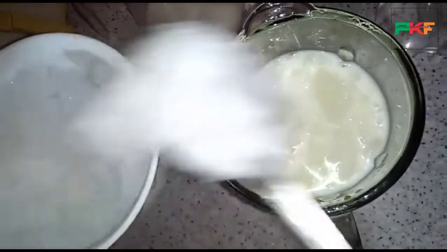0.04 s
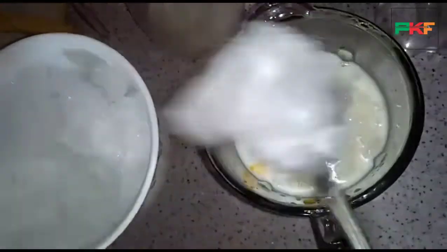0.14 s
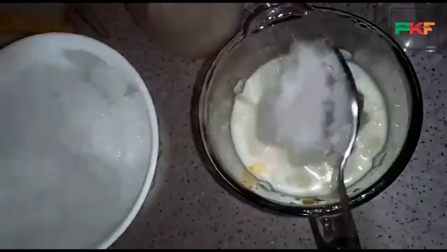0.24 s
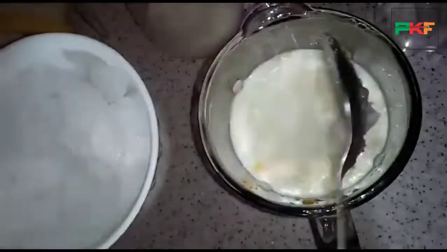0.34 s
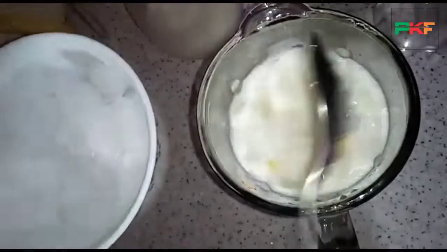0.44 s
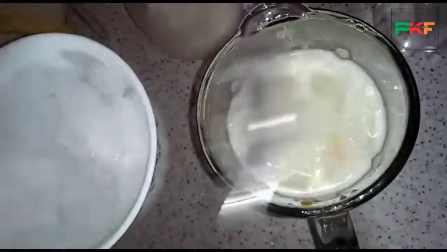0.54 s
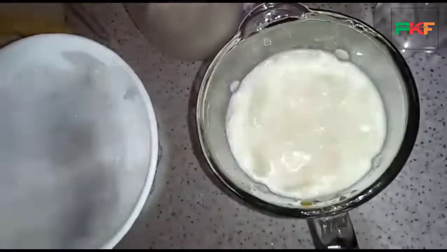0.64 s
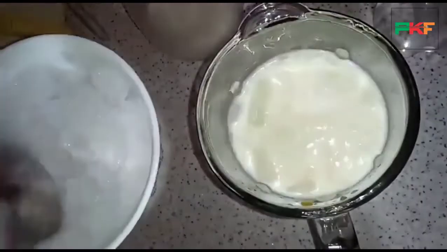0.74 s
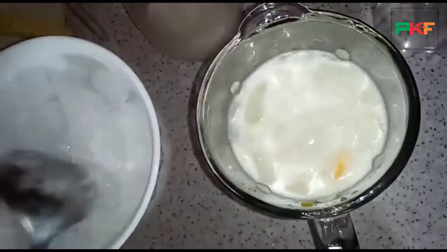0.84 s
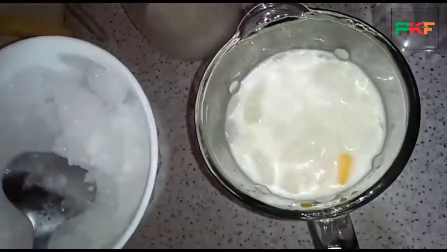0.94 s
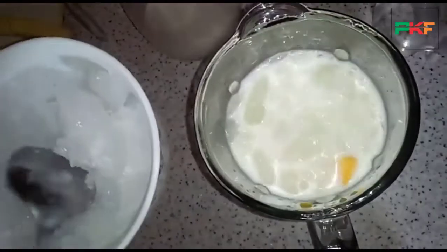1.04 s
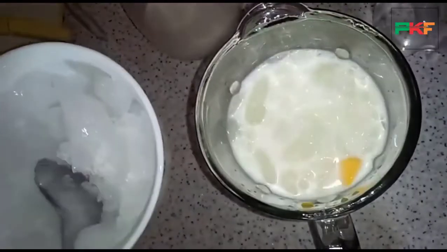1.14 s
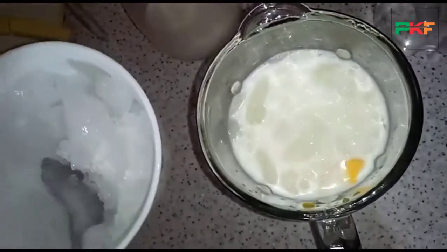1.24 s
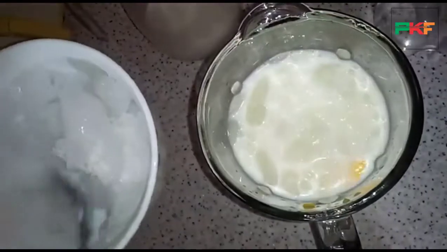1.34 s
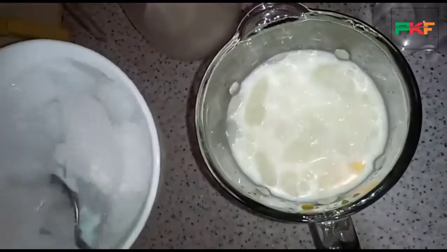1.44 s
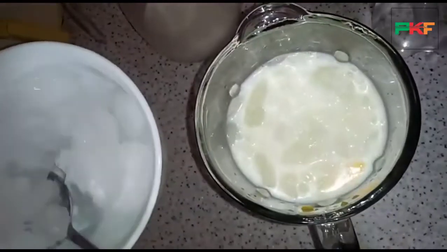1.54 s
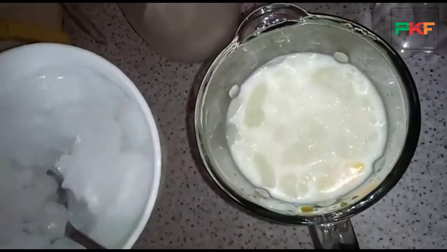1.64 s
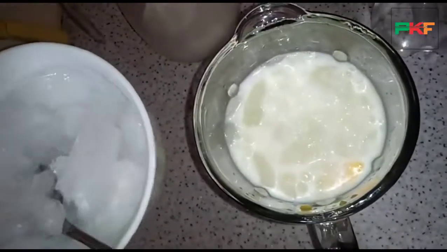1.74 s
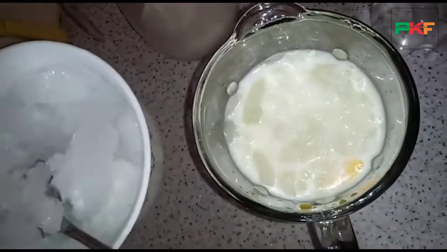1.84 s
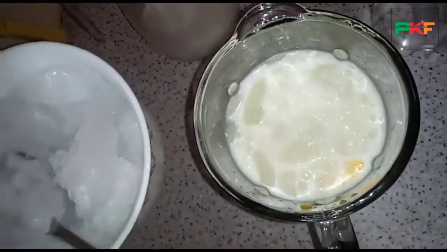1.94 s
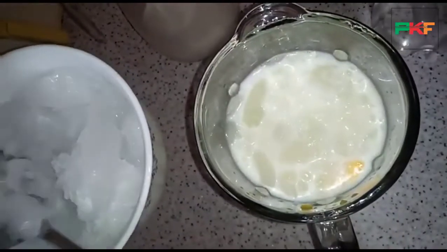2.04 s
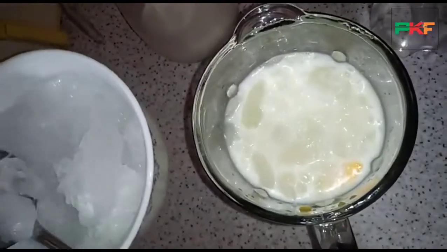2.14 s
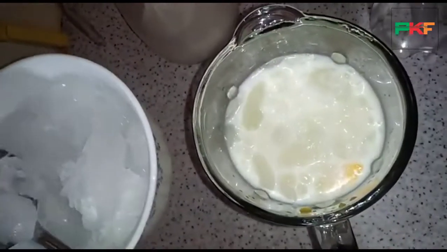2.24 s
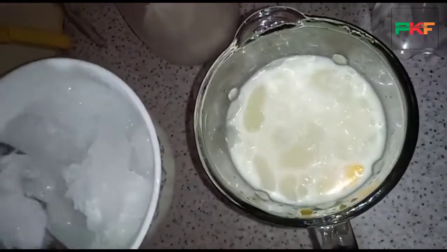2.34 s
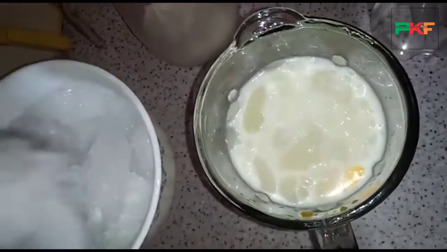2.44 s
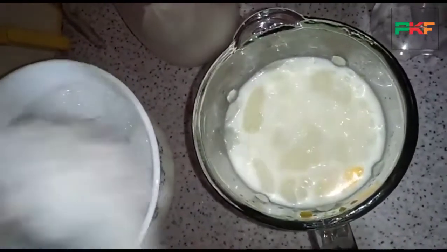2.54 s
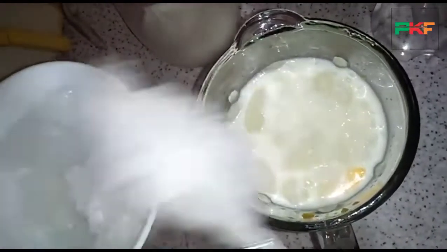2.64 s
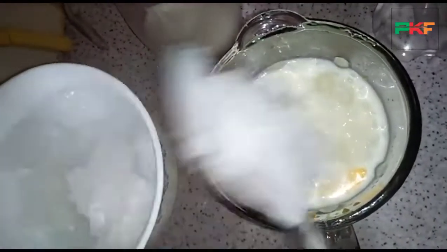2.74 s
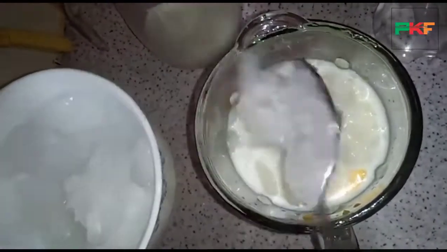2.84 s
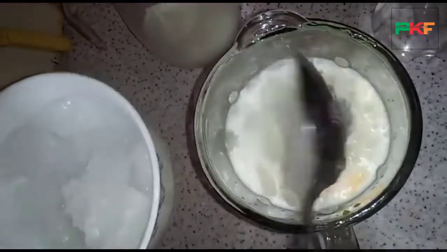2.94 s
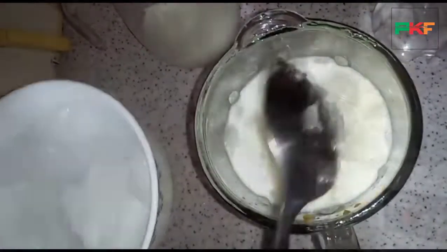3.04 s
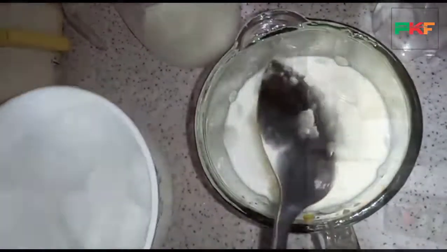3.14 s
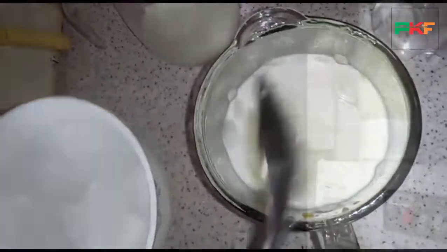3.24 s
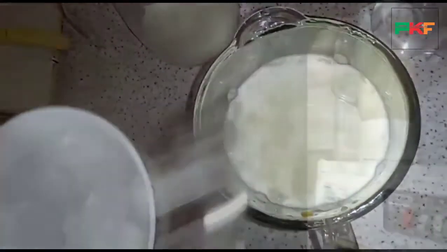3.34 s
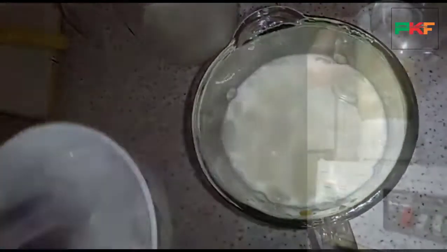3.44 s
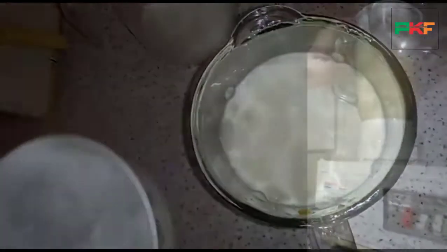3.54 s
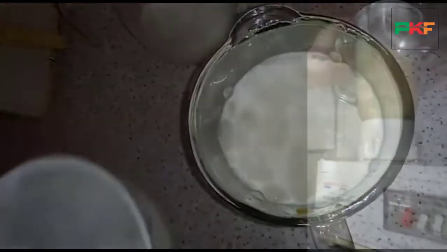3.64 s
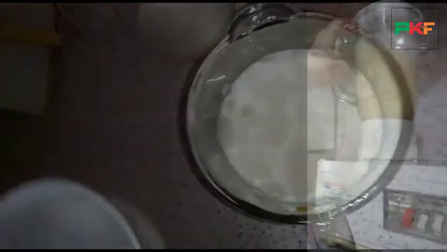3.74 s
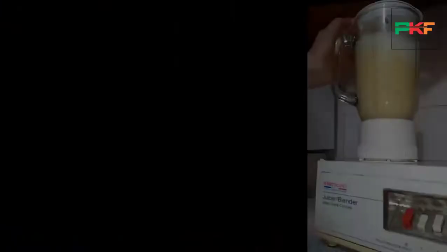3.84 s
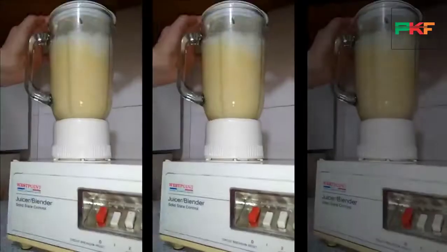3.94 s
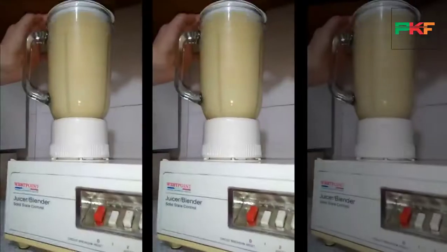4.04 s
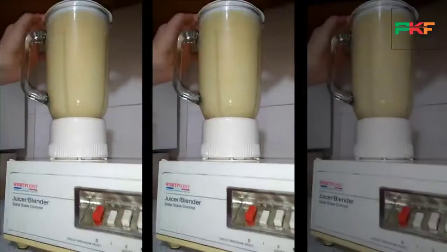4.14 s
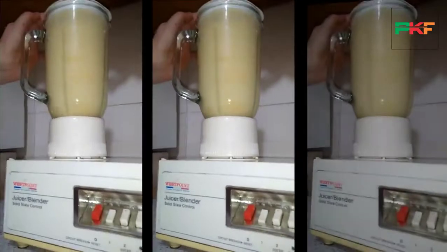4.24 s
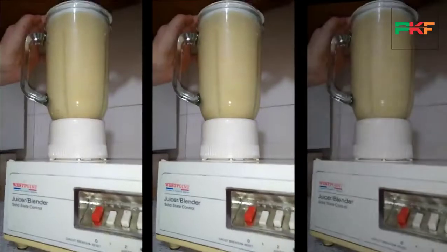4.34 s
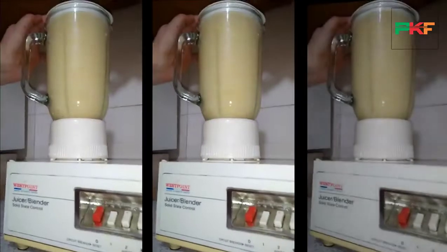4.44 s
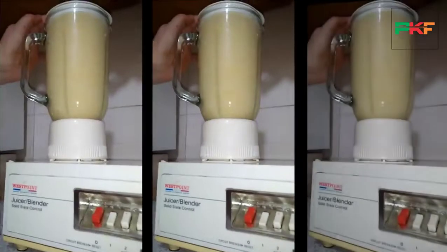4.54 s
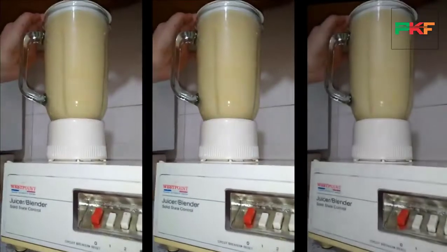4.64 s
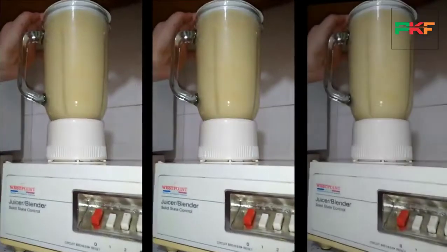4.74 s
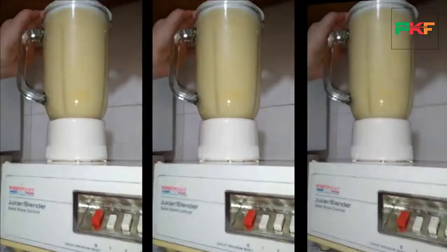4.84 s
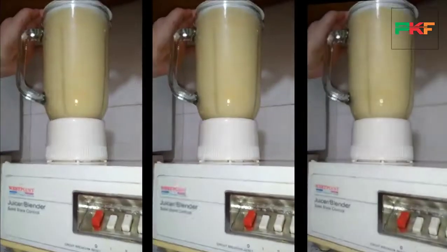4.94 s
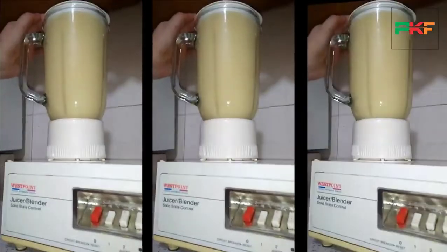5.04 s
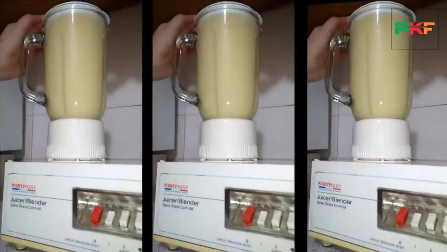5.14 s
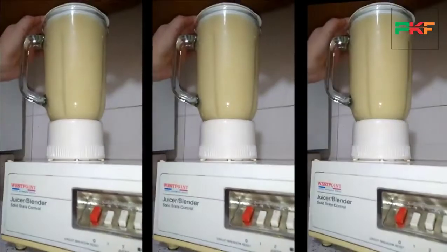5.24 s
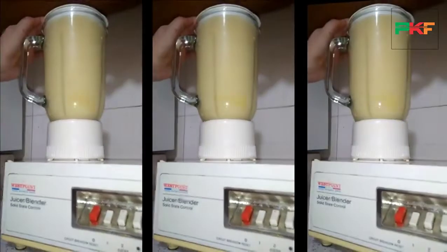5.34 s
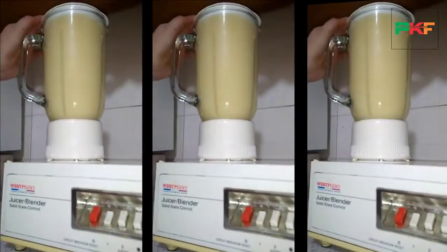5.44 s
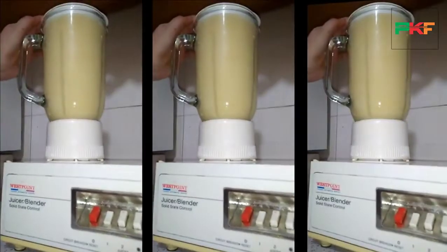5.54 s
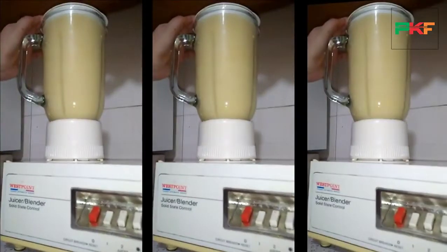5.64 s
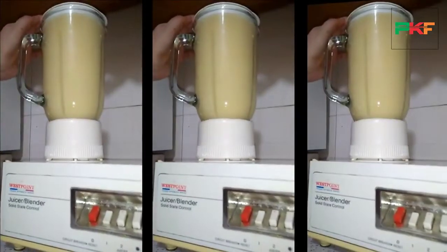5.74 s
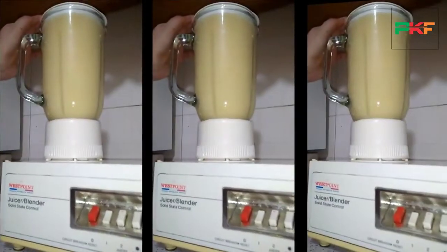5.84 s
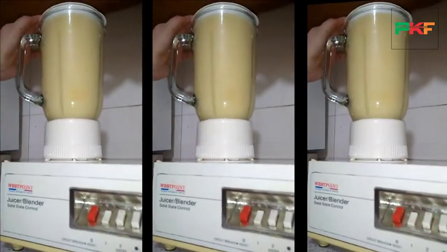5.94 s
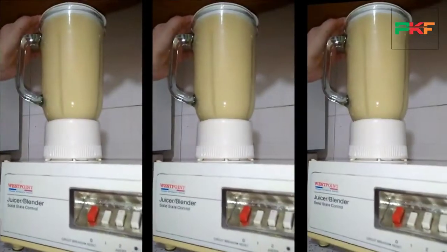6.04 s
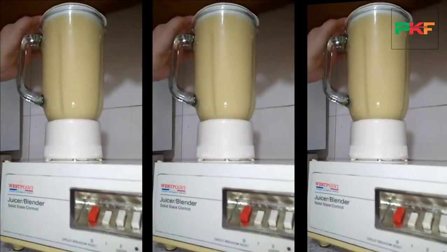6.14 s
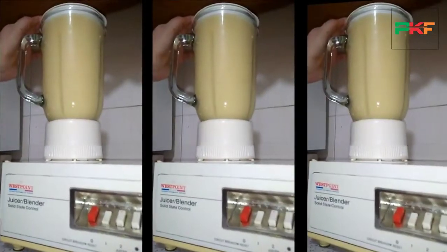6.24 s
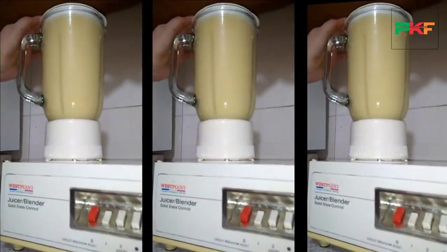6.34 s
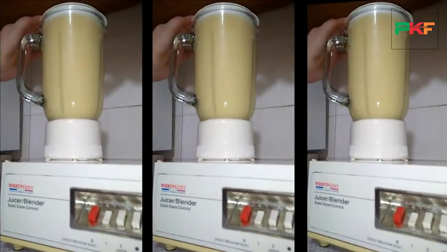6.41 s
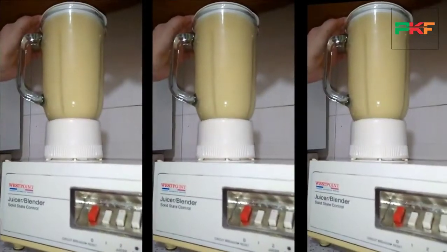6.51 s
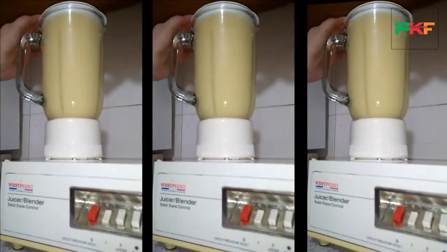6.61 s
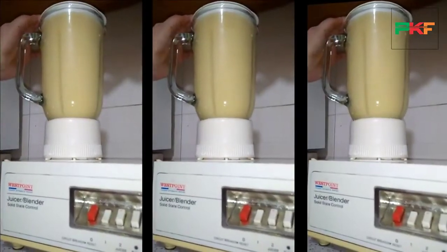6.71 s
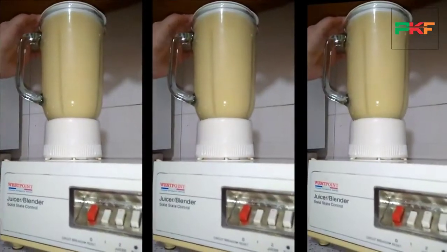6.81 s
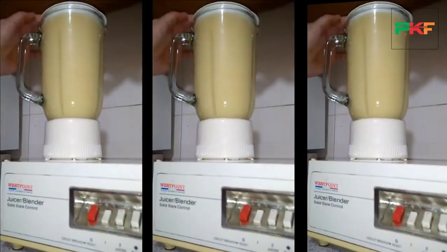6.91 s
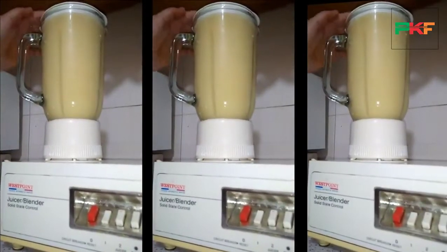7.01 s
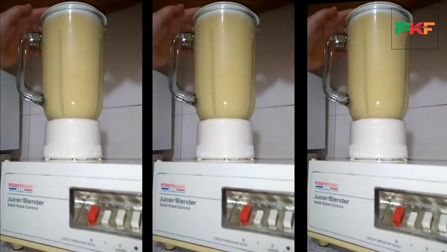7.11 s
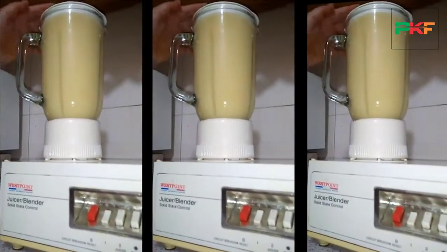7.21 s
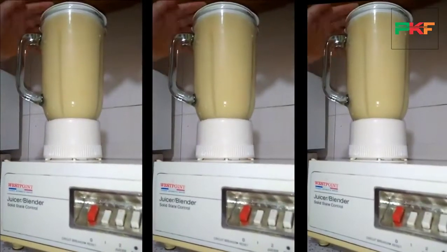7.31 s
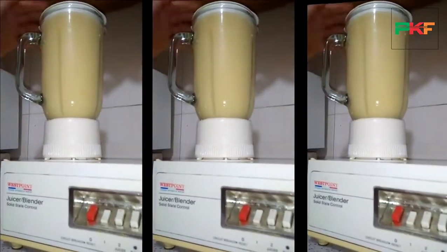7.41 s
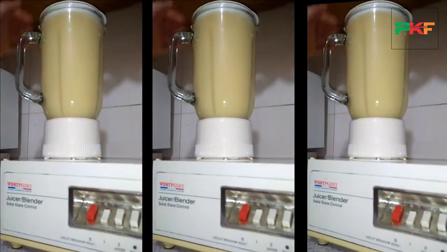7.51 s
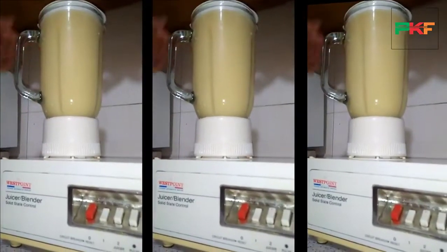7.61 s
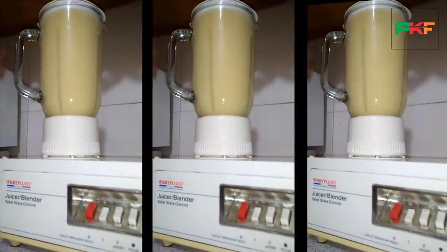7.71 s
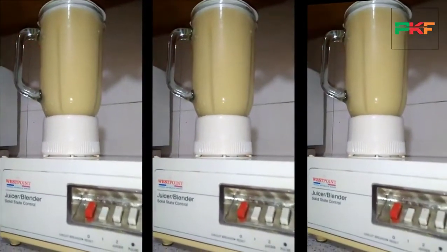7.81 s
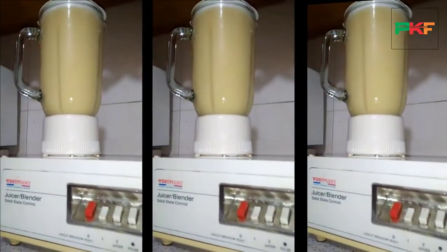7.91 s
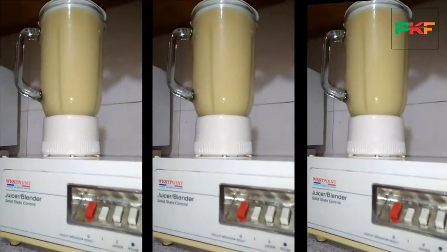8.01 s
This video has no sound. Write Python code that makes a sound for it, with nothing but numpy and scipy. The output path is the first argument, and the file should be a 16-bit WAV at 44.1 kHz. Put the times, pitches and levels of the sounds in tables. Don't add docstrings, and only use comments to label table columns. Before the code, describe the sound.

A spoon crunches and knocks through crushed ice in a plastic tub, ice drops into a glass jar, silence, then a harsh blender roars abruptly.

```python
import sys
import numpy as np
from scipy import signal
from scipy.fft import rfft, irfft, next_fast_len
from scipy.io import wavfile

SR = 44100
rng = np.random.default_rng(int(sys.argv[2]) if len(sys.argv) > 2 else 0)


def store_pcm(level_fs):
    pcm = np.round(np.clip(level_fs, -1, 1) * 32767).astype(np.int16)
    wavfile.write(sys.argv[1], SR, np.atleast_2d(pcm).T)


def field_ratio(decibels):
    return 10 ** (np.asarray(decibels, dtype=float) / 20)


N = 355887
FADE_S, BLENDER_START_S = 3.94, 4.668

# (time [s], hold [s], housing level [dB], spray level [dB])
SURGES = [(4.688, 0.15, -20, -26), (4.815, 0.093, -17.5, -22.5), (4.951, 0.012, -13.5, -17.5),
          (5.0, 0.052, -9, -18.5), (5.089, 0.086, -13, -19), (5.237, 0.071, -9.5, -17),
          (5.354, 0.044, -8, -15), (5.522, 0.1, -17.5, -23.5), (5.623, 0.017, -13.5, -29),
          (5.7, 0.012, -22.5, -26), (5.775, 0.04, -18.5, -27.5), (5.878, 0.0094, -11, -17),
          (5.963, 0.017, -16.5, -21.5), (6.05, 0.036, -13.5, -21), (6.158, 0.001, -13.5, -19),
          (6.245, 0.048, -17, -20), (6.333, 0.003, -14.5, -17), (6.392, 0.11, -17.5, -18.5),
          (6.625, 0.1, -20.5, -18.5), (6.759, 0.033, -14, -15.5), (6.917, 0.031, -14, -16.5),
          (7.103, 0.011, -18.5, -19.5), (7.218, 0.0011, -21.5, -16), (7.295, 0.0009, -19, -19.5),
          (7.427, 0.048, -22.5, -20), (7.539, 0.004, -20, -18.5), (7.682, 0.028, -25, -23),
          (7.736, 0.076, -23, -22.5), (7.911, 0.04, -26, -23)]
SURGE_RISE_DB_PER_S, SURGE_FALL_DB_PER_S = 379, 150.5
# (time [s], hold [s], level [dB])
JOLTS = [(4.681, 0.34, -21), (4.876, 0.034, -16), (4.971, 0.0009, -13.5), (5.04, 0.08, -24),
         (5.241, 0.13, -21.5), (5.406, 0.002, -14.5), (5.64, 0.11, -24), (5.81, 0.087, -22.5),
         (5.91, 0.12, -20), (6.045, 0.008, -16.5), (6.153, 0.002, -14.5), (6.26, 0.055, -21),
         (6.411, 0.08, -19), (6.611, 0.002, -19), (6.753, 0.017, -23), (6.914, 0.001, -17.5),
         (7.15, 0.043, -15), (7.293, 0.002, -16.5), (7.388, 0.096, -20), (7.549, 0.001, -12.5),
         (7.681, 0.051, -19.5), (7.778, 0.001, -16), (7.93, 0.066, -21), (8.048, 0.064, -13.5)]
JOLT_RISE_DB_PER_S, JOLT_FALL_DB_PER_S = 670, 120.5
# (time [s], hold [s], level [dB])
GULPS = [(4.752, 0.003, -30), (4.96, 0.04, -25.5), (5.095, 0.021, -26.5), (5.224, 0.041, -25.5),
         (5.361, 0.047, -25.5), (5.55, 0.25, -31), (5.625, 0.00086, -25.5), (5.904, 0.18, -30.5),
         (6.17, 0.002, -25.5), (6.318, 0.003, -24.5), (6.445, 0.049, -23), (6.613, 0.016, -28.5),
         (6.749, 0.0065, -22), (6.964, 0.013, -23.5), (7.137, 0.00094, -30), (7.205, 0.062, -23.5),
         (7.441, 0.097, -27), (7.72, 0.0062, -22), (7.807, 0.004, -32), (7.94, 0.069, -27)]
GULP_RISE_DB_PER_S, GULP_FALL_DB_PER_S = 144, 157
# (time [s], peak [dB])
BLADE_HITS = [(4.9543, -7), (5.0077, -2.5), (5.1663, -12), (5.2385, 1), (5.2912, -4), (5.628, -1),
              (5.662, -9.5), (5.7696, -2.5), (5.8453, -5), (5.8862, -3.5), (6.0373, -8), (6.1493, -10),
              (6.2381, 1.5), (6.3343, -3), (6.6166, -6), (6.758, -2), (7.1852, -5), (7.217, -3),
              (7.296, -7), (7.5389, -22), (7.914, -9.5)]
# (time [s], peak [dB], jar wall level [dB])
HOUSING_BLOWS = [(4.7525, -2, -6), (4.8054, -5.5, -3), (4.9356, 0, -4), (4.962, 0.5, -3),
                 (4.9981, -0.5, -3.5), (5.0376, -0.5, -1), (5.0685, -3.5, -2.5), (5.1207, -6.5, -2),
                 (5.169, -4.5, -9), (5.24, -3, -3), (5.3174, -1, -1), (5.353, -3.5, -4),
                 (5.3884, -6.5, -16), (5.493, -10, -5), (5.5186, -10, 4), (5.6325, 1, -13),
                 (5.6681, 1, -12), (5.7154, -2, -6), (5.7734, -9, 0), (5.7963, -6, -6), (5.8464, -4, -7),
                 (5.891, -1, -12), (5.9161, -3, -6), (5.948, -2, -8), (5.9947, -1, -8), (6.0242, -2, -8),
                 (6.0555, 6.5, -7.5), (6.1196, -6, -1.5), (6.152, 0, -4.5), (6.2105, -10, -10),
                 (6.2379, -3, -6), (6.2746, -8.5, -10), (6.3361, -24, -6), (6.3616, -6, -3),
                 (6.403, 0.5, -2.5), (6.4788, 1.5, -5), (6.616, -8, -7), (6.645, -8, -6),
                 (6.7125, -7, -4.5), (6.7562, -4.5, -3), (6.9024, -12, 1.5), (6.9477, -5.5, 0.5),
                 (7.0883, -13, -5), (7.1258, -7.5, 3), (7.19, -15, -11), (7.223, -6.5, -2),
                 (7.3428, -22, -8), (7.3733, -23, -9), (7.424, -7, 1), (7.5406, -8, -3), (7.571, -9.5, -3),
                 (7.6576, -22, -1), (7.7532, -3.5, -13), (7.9031, -12, 3), (8.0108, -12.5, 3),
                 (8.052, -18, -5)]
# (time [s], speed [turns/s], hum level [dB])
SHAFT = [(4.7, 115.5, -49.5), (5.15, 115, -48), (5.36, 120, -38), (5.67, 117.5, -46.5), (5.81, 123, -40.5),
         (6.9, 126.5, -40), (8.07, 130, -39)]
# (frequency [Hz], width [Hz], level [dB])
SLOSH_PEAKS = [(173, 33, -8), (259.5, 40, -3.5), (307, 50, -6), (463, 55, -2.5), (566.3, 28, 0),
               (607, 50, 1.5), (730, 51, -6.5), (911, 124, -12.5)]
# (frequency [Hz], width [Hz], level [dB])
BOOM_PEAKS = [(1001, 71, -11.5), (1045, 35, -1), (1085.4, 92, -12.5)]
# (frequency [Hz], width [Hz], level [dB])
HOUSING_PEAKS = [(1328, 33, -4.5), (1595, 80, -1), (1638, 45, 3), (1764, 33, 4), (1870, 40, 0),
                 (2022, 130, -2.5), (2109, 67, -3), (2320, 65, -3.5), (2190, 200, -11), (2570, 66, -11),
                 (2900, 200, -26.5)]
# (frequency [Hz], level per Hz [dB])
GRIND_SPECTRUM = [(1470, -15.5), (2500, 5), (3290, -9.5), (4280, -8.5), (4760, -1.5), (5580, -13.5),
                  (6000, -10), (7800, -37.5), (13200, -120)]
# (frequency [Hz], level per Hz [dB])
SPRAY_SPECTRUM = [(3290, -55), (5600, -22.5), (6390, 4.5), (7170, -7.5), (7790, -0.5), (8850, -1),
                  (11100, -7.5), (12000, -9.5), (13700, -12), (14500, -19)]
# (frequency [Hz], level per Hz [dB])
MOTOR_SPECTRUM = [(15, -69), (25, -32), (120, -11.5), (610, -17.5), (840, -4), (1040, 1), (1250, -11),
                  (1770, 3.5), (3540, -21), (8740, -10.5), (14500, -34.5)]
MOTOR_DB = -26

# (time [s], peak [dB], wall level [dB], bowl level [dB], handle level [dB])
KNOCKS = [(1.134, -36, -9, -14, -28), (1.217, -22, -6, -3.5, -23), (1.384, 7.5, -2, -25, -11.5),
          (1.55, -18, 7.5, -22, -21), (1.559, -16.5, -18, -21, -0.5), (1.59, -5.5, -30, -1, -26),
          (1.598, 6.5, -38, -11.5, -30), (1.63, 9, -39, -4.5, -11.5), (1.64, 9, -39, -3, -17.5),
          (1.837, -10, -46, 4, -11.5), (2.092, -36, -13, 3, -38), (2.19, -33, -20, -2.5, -34),
          (2.29, -39, -14, -12, -21), (2.346, -24, -19, -7, -30), (2.389, -42.5, -4, -6, -16.5),
          (2.527, -33.5, -11, -16, -26), (2.76, -39.5, -8.5, -20.5, -28)]
# (frequency [Hz], level [dB], time to fall 60 dB [s])
PART_TONES = [
    [(618, -4, 0.01), (905, -7, 0.053), (1028, -0.5, 0.099), (1200, -6.5, .04)],
    [(1565, -8.5, 0.14), (2014, -4.5, 0.044), (2046, -7, 0.056), (2260, -18.5, 0.045), (2670, -25, 0.046)],
    [(3216, -9, 0.052), (3310, -1, 0.019)],
    [(3600, 3, .06), (4060, -7.5, .03)],
    [(5100, -8.5, 0.016), (5570, 0, 0.044), (6360, -13, 0.019), (9680, -8, 0.049)],
]
NECK_DB, NECK_FOLLOWS_WALL, STEM_DB, STEM_DAMPED_BY_WALL, EDGE_DB = 8, 0.72, -8, 0.12, 1.5
# (frequency [Hz], level [dB], time to fall 60 dB [s])
SPOON_RING_TONES = [(3460, -14, 0.38), (3601, -10.5, 0.45), (5507, -12.5, .33)]
SPOON_RING_DB = -23.5
# (time [s], hold [s], tub level [dB], crunch level [dB], spoon hum level [dB])
STROKES = [(.44, 0.65, -72, -90, -71), (.898, .003, -57.5, -70.5, -75), (1.02, 0.016, -67, -62.5, -60),
           (1.133, 0.035, -44, -54, -69), (1.212, 0.014, -43, -56, -64), (1.295, .03, -38, -50, -60),
           (1.322, .015, -31, -35, -46), (1.342, 0.018, -29, -33.5, -50), (1.43, 0.0079, -30, -39, -40),
           (1.5, 0.027, -43, -52, -53), (1.552, 0.071, -37, -38, -48), (1.68, 0.0098, -33, -38, -51),
           (1.76, 0.053, -46.5, -50, -60), (1.835, .005, -50, -47, -32), (1.87, 0.18, -50, -52, -68),
           (2.09, 0.13, -54.5, -53.5, -63), (2.194, 0.011, -59, -46.5, -73), (2.288, 0.014, -49, -48, -67),
           (2.345, 0.022, -46.5, -44.5, -56), (2.39, 0.0099, -52, -52, -69), (2.514, 0.025, -57, -50, -65)]
STROKE_RISE_DB_PER_S, STROKE_FALL_DB_PER_S = 1600, 278.5
# (frequency [Hz], width [Hz], level [dB])
TUB_PEAKS = [(774, 70, -6), (920, 57, 5), (1220, 220, -8.5), (1650, 100, 0.5), (2091, 120, -8.5),
             (2540, 230, -10.5)]
# (frequency [Hz], width [Hz], level [dB])
SPOON_PEAKS = [(2230, 110, 0)]
# (frequency [Hz], level per Hz [dB])
CRUNCH_SPECTRUM = [(1470, -22.5), (2500, -1), (3940, -12.5), (5100, -9.5), (5530, -5), (6000, -7),
                   (13400, -7), (14500, -7)]
# (time [s], peak [dB], bowl level [dB])
TICKS = [(1.895, -32, -9), (2.046, -45, -12), (2.071, -35, -9), (2.09, -30, -9), (2.134, -41, -2),
         (2.154, -41, -9), (2.186, -37, -7), (2.197, -44, -9), (2.242, -45, -3), (2.288, -32, -10),
         (2.304, -39, -4), (2.346, -32, 1), (2.355, -36, -4), (2.369, -40, -4), (2.393, -32, -9),
         (2.439, -41.5, -4), (2.459, -49, -5), (2.512, -44.5, -2), (2.523, -41, -5), (2.539, -45, -6),
         (2.573, -41.5, -2.5)]

# (time [s], hold [s], jar air level [dB], fizz level [dB])
SLIDES = [(.463, .004, -70, -50), (.486, .004, -42, -60), (.5, 0.082, -34, -29.5), (.62, 0.03, -63, -44),
          (.668, 0.0041, -44, -38), (.7, 0.019, -55, -57), (3.105, 0.0074, -65.5, -58),
          (3.139, 0.01, -21.5, -23), (3.19, .035, -44.5, -34.5), (3.234, 0.015, -30.5, -25),
          (3.3, 0.037, -48.5, -59), (3.4, 0.064, -63.5, -80.5), (3.569, 0.021, -57.5, -49),
          (3.64, .01, -65.5, -75.5)]
SLIDE_RISE_DB_PER_S, SLIDE_FALL_DB_PER_S = 4500, 351
# (time [s], peak [dB], crack level [dB], thump level [dB])
LUMPS = [(0.494, 8.5, -15, -32), (0.668, -22, 0.5, -38), (3.136, -4.5, -11, -25), (3.145, -8, -7, -43),
         (3.237, -1.5, -24, -44), (3.262, -7, -27, -40), (3.569, -39.5, -10.5, -22)]
# (frequency [Hz], width [Hz], level [dB])
JAR_PEAKS = [(955, 310, -11.5), (1116, 86, -2.5), (1310, 100, -10), (1680, 460, -16), (2197, 150, -9.5),
             (2610, 390, -21.5)]
# (frequency [Hz], level per Hz [dB])
FIZZ_SPECTRUM = [(1470, -41.5), (2500, -14.5), (3580, -7.5), (4740, -1.5), (7260, -1), (9400, -2.5),
                 (13400, -5), (14500, 0.5)]
# (time [s], peak [dB], snap level [dB])
CHIPS = [(0.494, -12, -6), (0.518, -22, -4), (0.534, -19, -6), (0.547, -17, -10), (0.561, -17, -8),
         (0.573, -20, -4), (0.587, -30, -6), (0.604, -39, -8), (0.619, -37, -6), (0.651, -36, -8),
         (0.668, -25, -8), (0.729, -36, -6), (3.135, -12, -16), (3.157, -21, -2), (3.168, -30, -4),
         (3.181, -25, -8), (3.203, -24, -8), (3.234, -21, -1), (3.239, -19, -11), (3.252, -19, -6),
         (3.261, -19, -6), (3.337, -35, -6), (3.374, -50.5, -7), (3.401, -48, -7), (3.424, -42, -6.5),
         (3.432, -42.5, -7)]

# (time [s], hold [s], level [dB])
BRUSHES = [(.49, 0.054, -52.5), (.69, 0.043, -62.5), (.95, 0.18, -64)]
# (time [s], hold [s], rumble level [dB])
GRIPS = [(.18, 0.055, -57.5), (.5, 0.057, -51), (.75, 1, -60), (2.58, 0.24, -61), (3.15, 0.033, -53),
         (3.4, 0.13, -62)]
GRIP_RISE_DB_PER_S, GRIP_FALL_DB_PER_S = 150.5, 99.5
# (frequency [Hz], level per Hz [dB])
ROOM_AIR_SPECTRUM = [(15, -54.5), (25, -17.5), (97, -3), (137, -28.5), (297, -10.5), (358, -28), (420, -10),
                     (735, -15.5), (959, -13.5), (1220, -16), (2080, -24), (14500, -39.5)]
ROOM_AIR_DB = -67.5
KITCHEN_T60_S = 0.18


def blender():
    housing_gain, spray_gain = swells(SURGES, SURGE_RISE_DB_PER_S, SURGE_FALL_DB_PER_S)
    boom_gain, = swells(JOLTS, JOLT_RISE_DB_PER_S, JOLT_FALL_DB_PER_S)
    slosh_gain, = swells(GULPS, GULP_RISE_DB_PER_S, GULP_FALL_DB_PER_S)
    hail = grains(10000, 2.6, 1.8)
    crackle = grains(500, 4.0, 3.0)

    notch = signal.iirnotch(375, 5.0, SR)
    slosh = signal.lfilter(*notch, resonant(hail, SLOSH_PEAKS, flutter_db=1.86))
    boom = resonant(hail, BOOM_PEAKS, flutter_db=1.5, widen=1.1)
    housing = field_ratio(-2) * resonant(hail + 0.35 * crackle, HOUSING_PEAKS, flutter_db=2.2, widen=1.15)
    grind = field_ratio(-7.5) * coloured(hail, GRIND_SPECTRUM) * field_ratio(2.0 * drift(16))
    spray = coloured(hail * field_ratio(2.2 * drift(22)) + 0.45 * crackle, SPRAY_SPECTRUM)
    fan = field_ratio(MOTOR_DB) * coloured(rng.standard_normal(N), MOTOR_SPECTRUM)
    out = slosh_gain * slosh + boom_gain * boom + housing_gain * (housing + grind) + spray_gain * spray
    return out + fan + shaft_hum() + blade_hits()


def shaft_hum():
    s, turns, hum_db = np.transpose(SHAFT)
    t = np.arange(N) / SR
    speed = np.interp(t, s, turns) * (1 + 0.03 * drift(9))
    angle = 2 * np.pi * np.cumsum(speed) / SR
    level_db = np.interp(t, s, hum_db) + 1.6 * drift(8.2)
    return np.sqrt(2) * field_ratio(level_db) * np.sin(angle)


def blade_hits():
    s, peak_db = np.transpose(BLADE_HITS)
    crack = band_pass(bursts(s, peak_db - 3.5, 0.042), 4000, 11000, 2)
    thud = bursts(s, peak_db - 43, 0.03)
    body = sum(field_ratio(level_db) * ring(thud, hz, 0.046) for hz, _, level_db in HOUSING_PEAKS + BOOM_PEAKS)
    return crack + body


def blows_on_housing():
    s, peak_db, wall_db = np.transpose(HOUSING_BLOWS)
    running = np.arange(N) / SR > BLENDER_START_S
    out = 0
    for level_db, peaks in (peak_db, HOUSING_PEAKS), (peak_db + wall_db, BOOM_PEAKS):
        shake = bursts(s, level_db, 0.06)
        strength = np.sqrt(np.mean(shake ** 2))
        out = out + strength * resonant(shake, peaks, widen=1.6) * running
    return field_ratio(-9.5) * out


def knocks():
    s, peak_db, wall_db, bowl_db, handle_db = np.transpose(KNOCKS)
    neck_db = handle_db + NECK_DB + NECK_FOLLOWS_WALL * wall_db
    stem_db = handle_db + STEM_DB - STEM_DAMPED_BY_WALL * wall_db
    parts_db = wall_db, bowl_db, neck_db, stem_db, handle_db + EDGE_DB
    ice = bursts(s, peak_db - 24, 0.013) + bursts(s, peak_db - 23, 0.055)
    out = signal.lfilter([0.6], [1, -0.4], ice)
    for tones, part_db in zip(PART_TONES, parts_db):
        chatter = bursts(s, peak_db + part_db - 25.5, 0.038)
        rattle = bursts(s, peak_db + part_db - 43, 0.32)
        for hz, level_db, t60 in tones:
            out = out + field_ratio(level_db) * ring(chatter + rattle, hz, min(t60, 0.045, 130 / hz))
    return high_pass(out, 760)


def spoon_ring():
    s, peak_db, wall_db, bowl_db, handle_db = np.transpose(KNOCKS)
    wall_part_db = 0.2 * wall_db * (wall_db > -10)
    struck_db = peak_db + handle_db + wall_part_db + SPOON_RING_DB + 10
    return sum(taps(s, struck_db, [(hz, 0, level_db)], t60) for hz, level_db, t60 in SPOON_RING_TONES)


def scraping():
    tub_gain, crunch_gain, hum_gain = swells(STROKES, STROKE_RISE_DB_PER_S, STROKE_FALL_DB_PER_S)
    rubbing = grains(2000, 2.8, 1.8)
    wall = rms_one(high_pass(resonant(rubbing, TUB_PEAKS, flutter_db=4.0, widen=0.75), 600))
    crunch = coloured(grains(8000, 3.0, 1.8), CRUNCH_SPECTRUM)
    hum = resonant(rng.standard_normal(N), SPOON_PEAKS, flutter_db=2.5)
    hum = resonant(hum, SPOON_PEAKS, flutter_db=1.5)
    return tub_gain * wall + crunch_gain * crunch + hum_gain * hum


def ticks():
    s, peak_db, bowl_db = np.transpose(TICKS)
    wall = taps(s, peak_db - 11, TUB_PEAKS[:3], 0.03)
    return wall + taps(s, peak_db + bowl_db - 4.5, TUB_PEAKS[3:], 0.036)


def pours():
    air_gain, fizz_gain = swells(SLIDES, SLIDE_RISE_DB_PER_S, SLIDE_FALL_DB_PER_S)
    air = rms_one(high_pass(resonant(grains(2500, 2.5, 2.0), JAR_PEAKS), 750))
    fizz = coloured(grains(9000, 3.0, 2.2), FIZZ_SPECTRUM)
    return air_gain * air + fizz_gain * fizz


def lumps():
    s, peak_db, crack_db, thump_db = np.transpose(LUMPS)
    crack = band_pass(bursts(s, peak_db + crack_db - 0.5, 0.015), 5500, 11000, 1)
    slap = bursts(s, peak_db - 33, 0.017)
    body = sum(field_ratio(level_db) * ring(slap, hz, 0.026) for hz, _, level_db in JAR_PEAKS)
    thump = ring(bursts(s, peak_db + thump_db - 27, 0.1), 95, 0.06)
    return crack + high_pass(body, 1100) + thump


def chips():
    s, peak_db, snap_db = np.transpose(CHIPS)
    snap = taps(s, peak_db + snap_db, [(1650, 0, 0)], 0.004)
    return taps(s, peak_db, JAR_PEAKS, 0.017) + snap


def pop():
    return taps([3.1462], [-5], [(1600, 0, 0)], 0.0035)


def background():
    air = field_ratio(ROOM_AIR_DB) * coloured(rng.standard_normal(N), ROOM_AIR_SPECTRUM)
    cloth = rms_one(band_pass(grains(600, 3.0, 4.9), 140, 520, 2))
    rumble = rms_one(band_pass(rng.standard_normal(N), 25, 100, 2))
    brush_gain, = swells(BRUSHES, STROKE_RISE_DB_PER_S, STROKE_FALL_DB_PER_S)
    grip_gain, = swells(GRIPS, GRIP_RISE_DB_PER_S, GRIP_FALL_DB_PER_S)
    return air + brush_gain * cloth + grip_gain * rumble


def kitchen(x):
    t = np.arange(SR // 2) / SR
    dull = signal.lfilter([1], [1, -0.75], rng.standard_normal(len(t)))
    dying = dull * field_ratio(-60 * t / KITCHEN_T60_S)
    delay = np.zeros(round(0.006 * SR))
    tail = np.concatenate([delay, dying / np.sqrt(np.sum(dying ** 2))])
    return signal.fftconvolve(x, tail)[:N]


def rms_one(x):
    return x / np.sqrt(np.mean(x ** 2) + 1e-20)


def high_pass(x, hz):
    return signal.sosfilt(signal.butter(3, hz, "high", fs=SR, output="sos"), x)


def band_pass(x, low_hz, high_hz, order):
    return signal.sosfilt(signal.butter(order, [low_hz, high_hz], "band", fs=SR, output="sos"), x)


def drift(rate_hz):
    r = np.exp(-2 * np.pi * rate_hz * 8 / SR)
    slow = signal.lfilter([1], [1, -2 * r, r * r], rng.standard_normal(N // 8 + 2002))[2000:]
    return np.interp(np.arange(N) / 8, np.arange(len(slow)), rms_one(slow))


def coloured(x, spectrum):
    hz, level_db = np.transpose(spectrum)
    size = next_fast_len(N)
    bins = np.maximum(np.fft.rfftfreq(size, 1 / SR), 1)
    gain = field_ratio(np.interp(np.log(bins), np.log(hz), level_db))
    return rms_one(irfft(rfft(x, size) * gain, size)[:N])


def resonant(x, peaks, flutter_db=0, widen=0.72):
    out = 0
    for k, (hz, width, level_db) in enumerate(peaks):
        r = np.exp(-np.pi * width * widen / SR)
        fed = x * field_ratio(flutter_db * drift(9)) if flutter_db else x
        tone = signal.lfilter([1, 0, -1], [1, -2 * r * np.cos(2 * np.pi * hz / SR), r * r], fed)
        out = out + (-1) ** k * field_ratio(level_db) * (1 - r * r) * tone
    return rms_one(out)


def ring(clicks, hz, t60):
    r, w = field_ratio(-60 / (t60 * SR)), 2 * np.pi * hz / SR
    return signal.lfilter([0, np.sin(w)], [1, -2 * r * np.cos(w), r * r], clicks + 1e-18)


def grains(per_s, spread_db, clump_db):
    sizes = field_ratio(spread_db * np.minimum(rng.exponential(1, N), 5)) * rng.choice([-1, 1], N)
    born = rng.random(N) < per_s / SR
    return rms_one(sizes * born * field_ratio(clump_db * drift(40)))


def clicks_at(times, level_db):
    clicks = np.zeros(N)
    np.add.at(clicks, np.round(np.array(times) * SR).astype(int), field_ratio(level_db))
    return clicks


def bursts(times, level_db, t60):
    clicks = clicks_at(times, level_db)
    dying = signal.lfilter([1], [1, -field_ratio(-60 / (t60 * SR))], clicks + 1e-18)
    return 2 * clicks + dying * rng.standard_normal(N)


def taps(times, level_db, peaks, t60):
    clicks = clicks_at(times, level_db)
    return sum((-1) ** k * field_ratio(db) * ring(clicks, hz, t60) for k, (hz, _, db) in enumerate(peaks))


def swells(rows, rise_db_per_s, fall_db_per_s):
    s, hold, *columns = np.transpose(rows)[:, :, None]
    t = np.arange(0, N, 32) / SR
    before, after = np.maximum(s - t, 0), np.maximum(t - s - hold, 0)
    shape_db = -rise_db_per_s * before - fall_db_per_s * after
    gains = [np.sqrt(np.sum(field_ratio(shape_db + level_db) ** 2, axis=0)) for level_db in columns]
    return [np.interp(np.arange(N) / SR, t, gain) for gain in gains]


def scene():
    t = np.arange(N) / SR
    blows = knocks() + spoon_ring()
    near = scraping() + ticks() + pours() + lumps() + high_pass(chips() + pop(), 1000)
    scooping = near + blows + field_ratio(-19) * kitchen(blows) + field_ratio(-20.5) * kitchen(near) + background()
    machine = blender() + blows_on_housing()
    blending = machine + field_ratio(-19) * kitchen(machine)
    fade_out = np.clip((FADE_S - t) / 0.015 + 1, 0, 1)
    cut_in = np.clip((t - BLENDER_START_S) / 0.001, 0, 1)
    return (scooping * fade_out + blending * cut_in)[None]


def band_limit(x):
    return signal.sosfilt(signal.butter(12, 15590, fs=SR, output="sos"), x)


def record(dry):
    overloaded = high_pass(np.clip(dry, -0.83, 0.83), 45)
    top_cut = signal.ellip(12, 0.3, 65, 14300, fs=SR, output="sos")
    mix = np.clip(signal.sosfilt(top_cut, overloaded), -0.97, 0.97)
    return band_limit(mix)


dry = scene()
out = record(dry)
store_pcm(out)
```